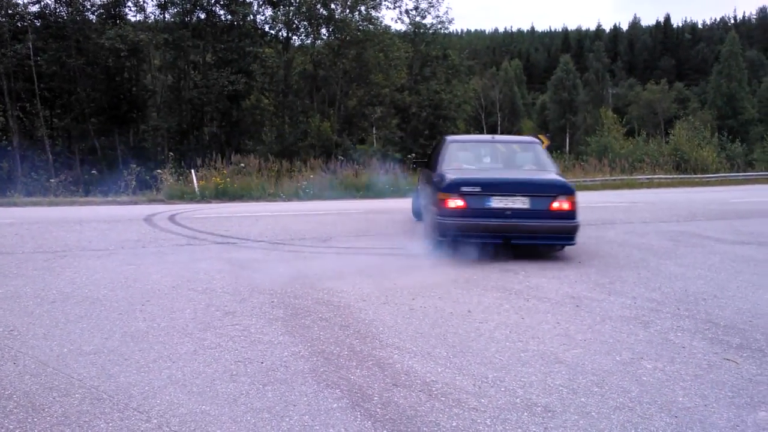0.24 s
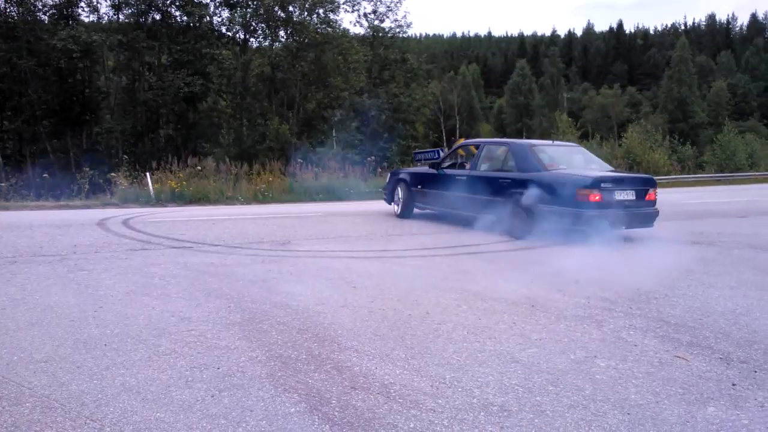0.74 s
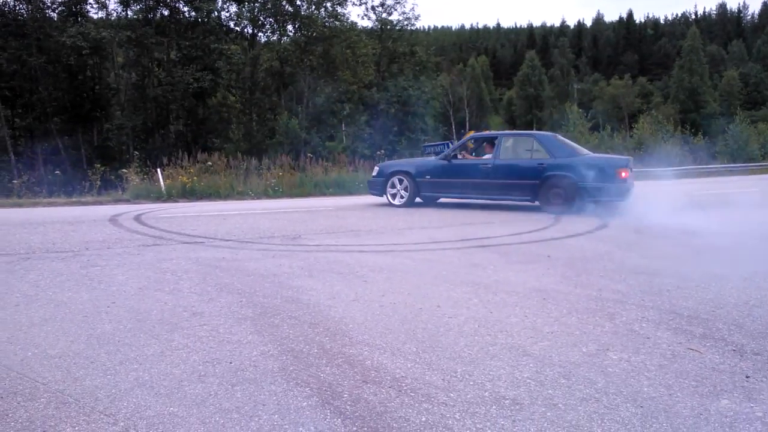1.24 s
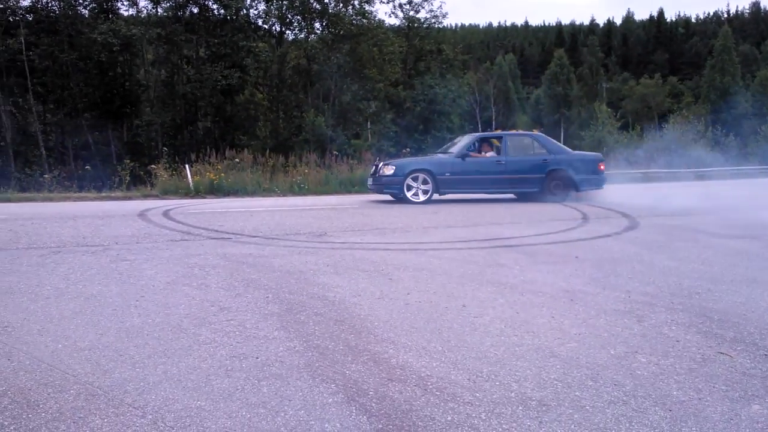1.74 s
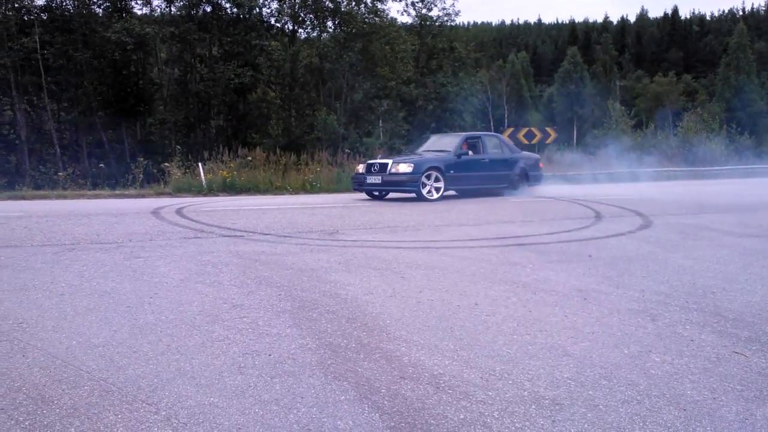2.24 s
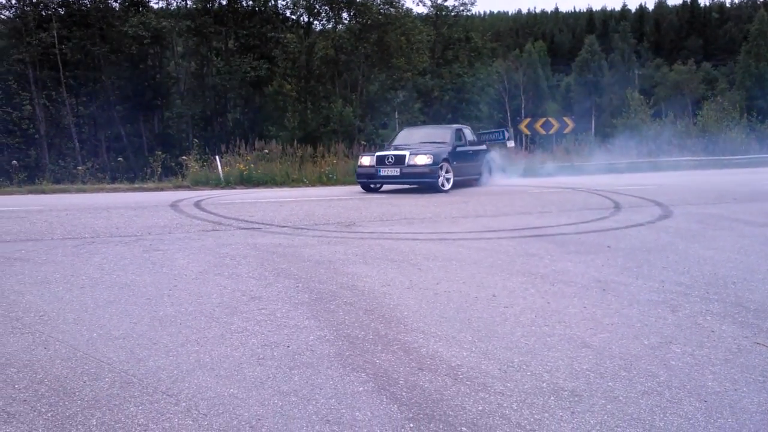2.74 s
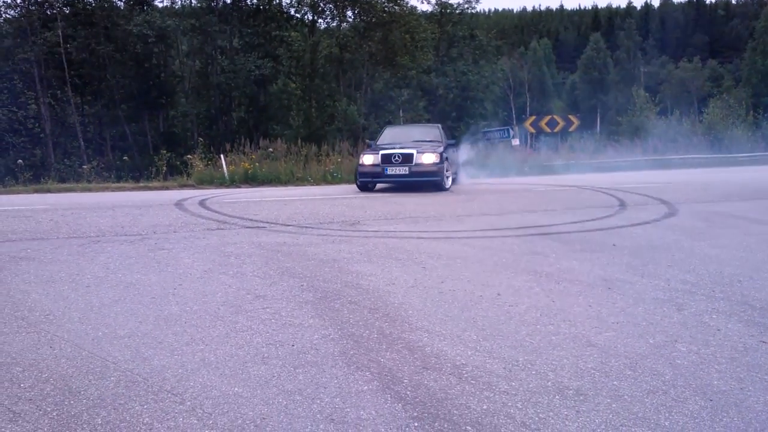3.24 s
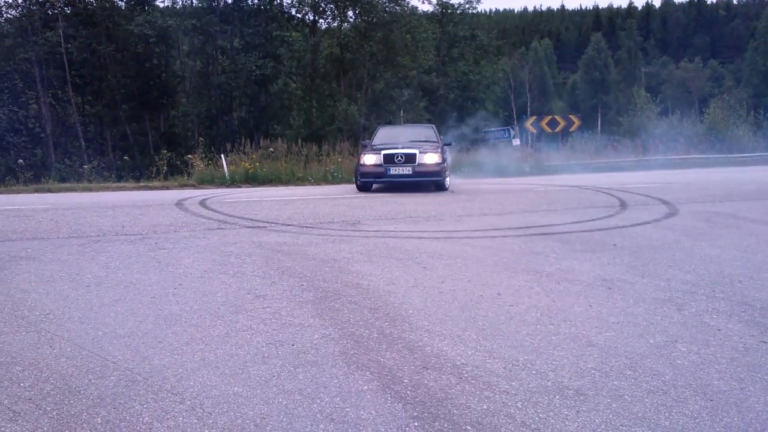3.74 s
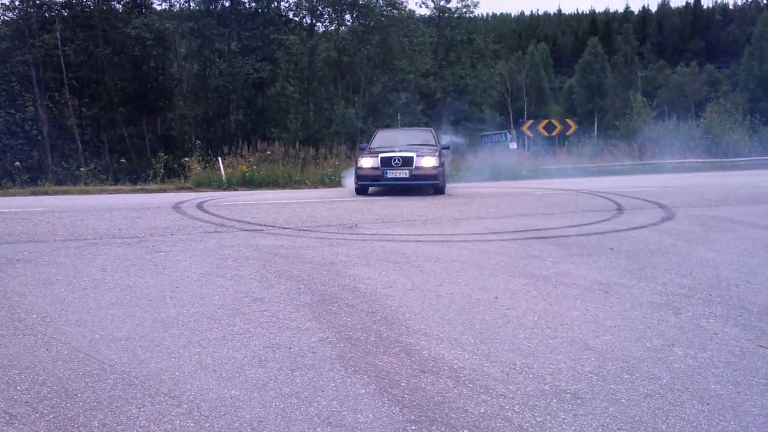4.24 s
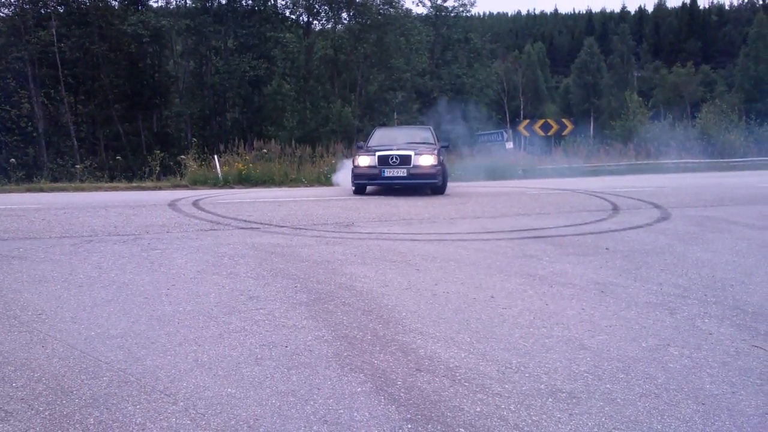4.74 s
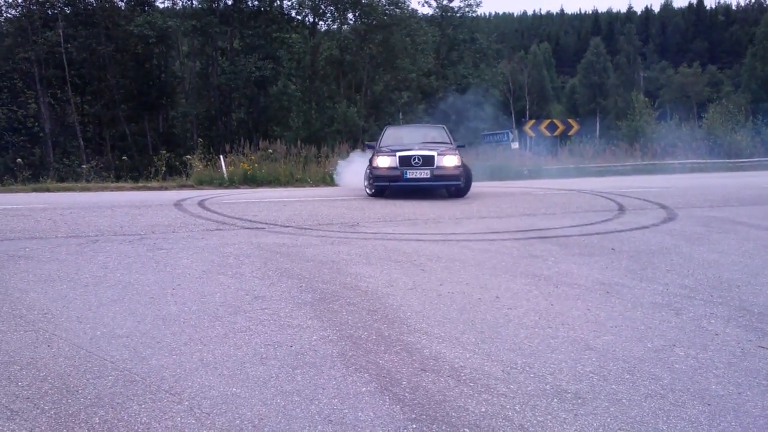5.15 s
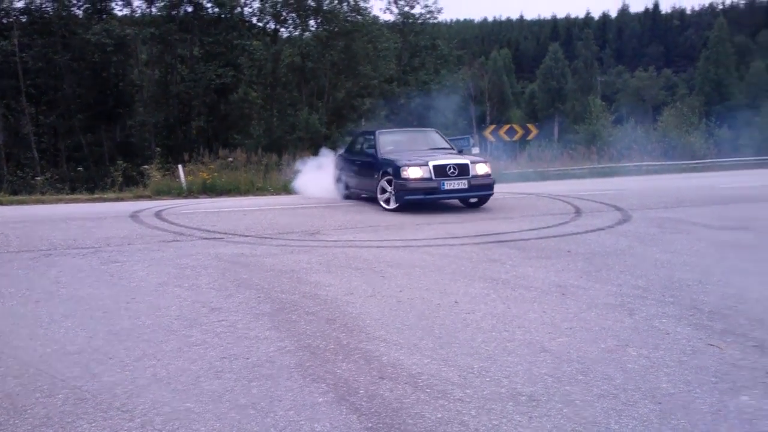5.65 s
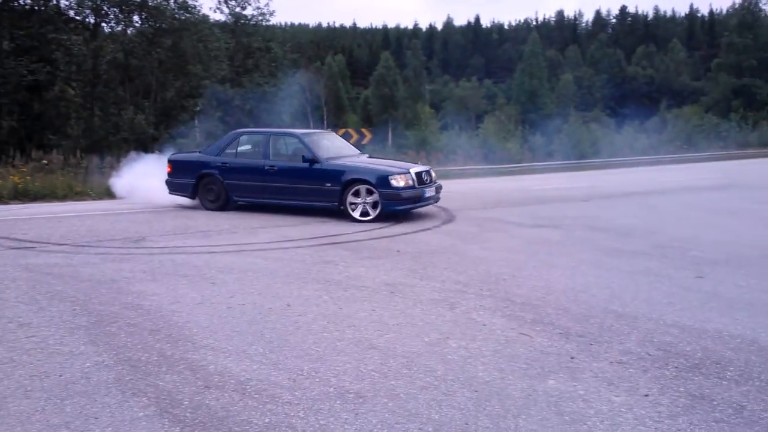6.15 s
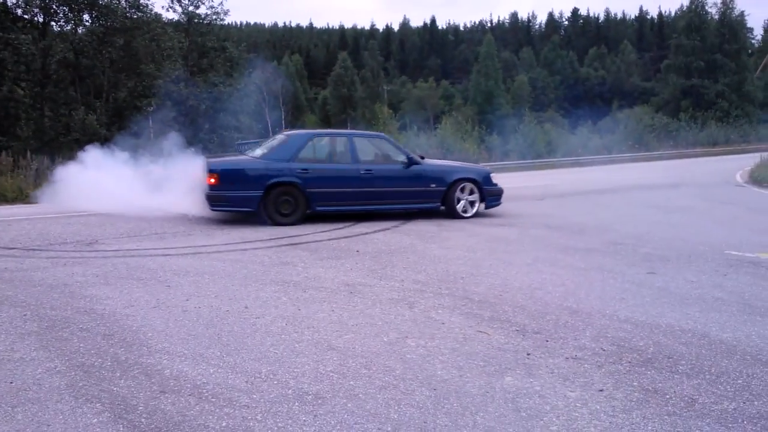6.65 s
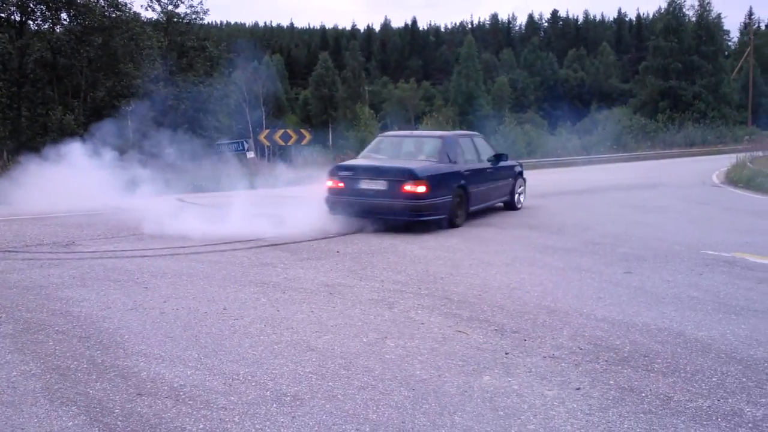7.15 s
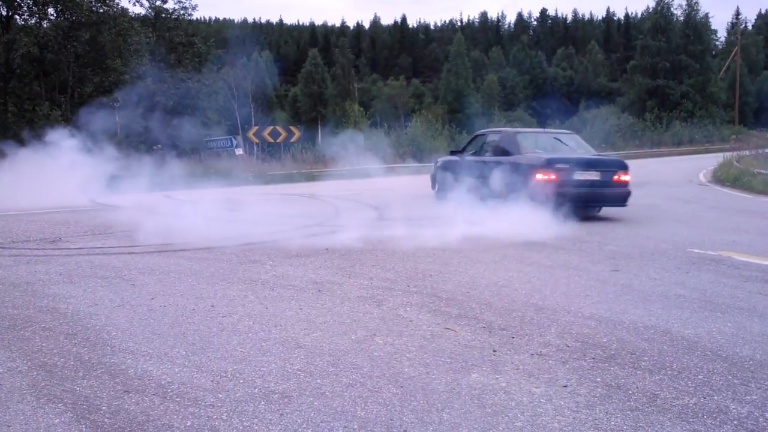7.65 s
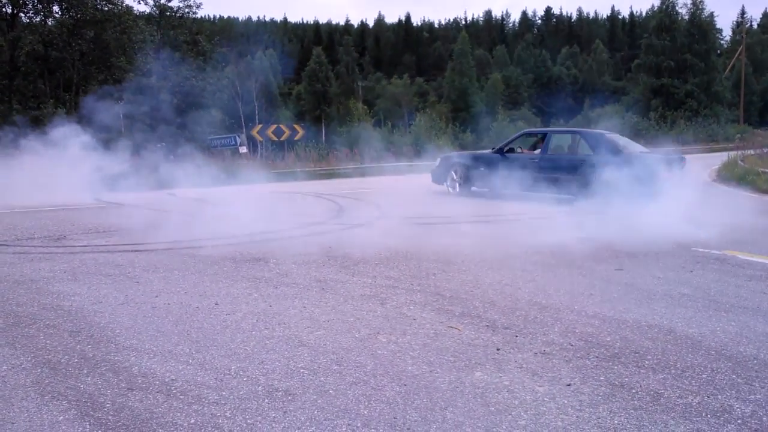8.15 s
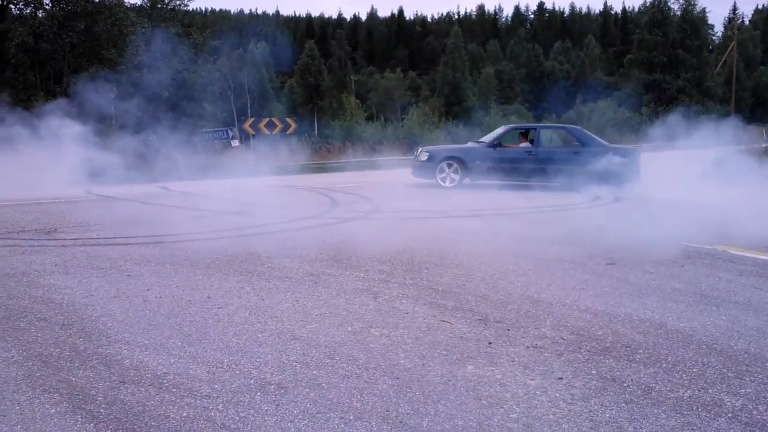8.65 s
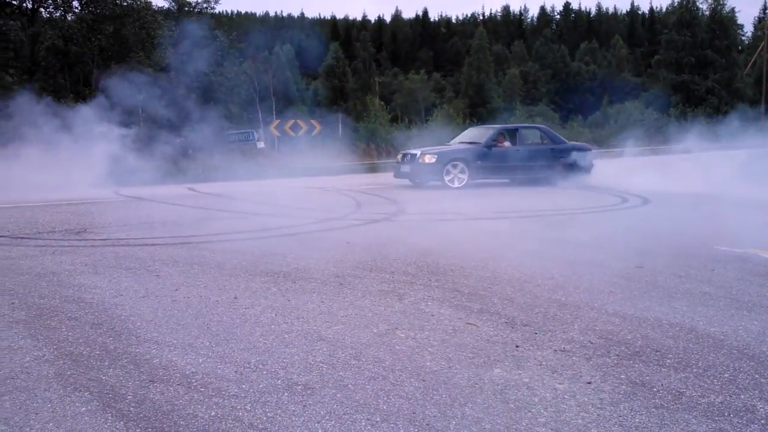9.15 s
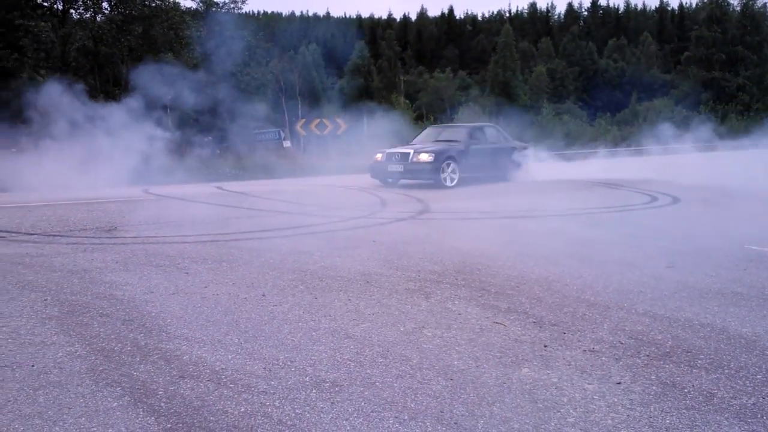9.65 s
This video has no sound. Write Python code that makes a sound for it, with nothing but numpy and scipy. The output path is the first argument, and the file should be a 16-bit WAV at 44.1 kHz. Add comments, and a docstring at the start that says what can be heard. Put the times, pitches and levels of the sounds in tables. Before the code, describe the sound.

A petrol car held at high revs spins its rear tyres on open tarmac, shrieking first and again midway over a rough tread roar.

```python
"""Tyre-spinning car on tarmac

Place: open tarmac, where a four-cylinder petrol car spins its rear tyres in circles.
Sources: the exhaust booms at the firing rate with a thin whine, both as sines; filtered noise makes the tread roar,
and jittery tones make the tyres shriek as the tail swings near. Distance: heard only in level and heading curves.
Microphone: small, overloading on the peaks; the tarmac adds one short, dull echo of the tyres."""
import sys
import numpy as np
from scipy import signal
from scipy.io import wavfile
from scipy.ndimage import uniform_filter1d, minimum_filter1d

SR = 44100
rng = np.random.default_rng(int(sys.argv[2]) if len(sys.argv) > 2 else 0)


def to_wav(sig):
    """Store sig (one row per channel, or 1-D mono) as 16-bit WAV at the path in sys.argv[1].

    Samples outside -1..1 are clipped; the rate is SR.
    """
    pcm = np.clip(np.atleast_2d(sig), -1, 1) * 32767
    pcm = np.round(pcm).astype(np.int16)
    wavfile.write(sys.argv[1], SR, pcm.T)  # frames by channels


N = 436590

# Firing rate of the engine: t/s, f/Hz
FIRING_RATE = [(0, 189.5), (.4, 188), (1.0, 189.8), (2.9, 190), (3.7, 192.3), (4.1, 194), (4.6, 205.6),
               (6.28, 205.6), (6.8, 197.5), (7.1, 178.7), (7.62, 179), (8.77, 189.7), (9.9, 198.3)]
# Way the car points as it turns on the spot; 0 = tail to the microphone, 180 = nose: t/s, heading/degrees
HEADING = [(0, -17), (.5, -7), (1.5, 83), (2.5, 143.5), (3.25, 170.5), (4.5, 188), (5.5, 203), (6.4, 266),
           (7.4, 370.5), (8.3, 449), (9.9, 525)]
# Firing tone, loud while the pipe is seen from the side: t/s, level/dB
BOOM_LEVEL = [(0, -25), (.22, -31), (.6, -21.5), (1.35, -16.5), (1.76, -16.5), (2.5, -21.5), (3.0, -34.5),
              (3.7, -33.5), (4.15, -38), (4.6, -26), (5.6, -24), (6.9, -22.5), (7.06, -30.5), (7.36, -27.5),
              (7.56, -22.5), (8.08, -21), (8.41, -16.5), (8.8, -16.5), (9.9, -22.5)]
# Brief dips of the firing tone as the revs fall: t/s, depth/dB
BOOM_DIPS = [(6.42, 9), (6.69, 4.5), (6.972, 6)]
# Other tones of the engine cycle, each beaming one way:
# multiple of firing rate, level off beam/dB, gain on beam/dB, beam heading/degrees, half-width/degrees
OVERTONES = [(.5, -59.5, 7.5, 270, 68), (.75, -58, 4, 330, 44), (1.25, -45, 5.5, 195, 36),
             (1.5, -45.5, 4.5, 210, 70), (1.75, -60, 5, 300, 60), (2, -45.5, 5, 220, 80),
             (2.25, -51.5, 12, 160, 60), (2.5, -45, 14, 255, 100), (2.75, -47.5, 12, 260, 40),
             (3, -38.5, 4.5, 140, 160), (3.25, -51.5, 7.5, 90, 40), (3.5, -43.5, 10.5, 150, 30),
             (3.75, -48, 12.5, 185, 21), (4, -46, 4, 100, 26), (4.5, -48.5, 15, 244, 51),
             (5, -40, 8, 210, 45)]
# Thin whine geared to the engine: the last four columns of OVERTONES
WHINE_BEAM = (-43, 12, 145, 40)
# Low growl of the tread: t/s, level/dB
GROWL_LEVEL = [(0, -7.5), (.25, -15), (.65, -15.5), (.9, -16.5), (1.08, -11.5), (1.3, -18), (1.6, -17.5),
               (2.8, -20.5), (4.1, -21.5), (4.55, -20), (5.1, -22.5), (5.85, -18), (6.22, -21.5),
               (6.32, -15), (6.7, -19), (6.85, -13), (6.98, -20.5), (7.12, -12.5), (7.8, -16.5),
               (8.36, -16.5), (8.6, -20), (9.13, -20.5), (9.7, -19), (9.9, -24)]
# Roar of the tread, loud while the tail is near: t/s, level/dB
ROAR_LEVEL = [(0, -11), (.25, -15), (.5, -17.5), (1.0, -17.5), (2.2, -18.5), (2.8, -18), (5.1, -19.5),
              (6.3, -18), (6.9, -16), (7.1, -14), (7.3, -15.5), (7.5, -16), (7.65, -19), (8.1, -19.5),
              (8.7, -19.5), (9.5, -18.5), (9.9, -18)]
# Relative noise spectra of the four rubbing ranges, low to high: f/Hz, level/dB per Hz
GROWL_SPECTRUM = [(60, -38.5), (150, -13), (300, -8.5), (500, -8), (800, -0.5), (1100, 2), (1500, 1.5),
                  (2200, -27.5)]
SCRUB_SPECTRUM = [(900, -24.5), (1400, 1.5), (1700, -3.5), (2300, 0), (2900, -8.5), (4000, -16)]
RASP_SPECTRUM = [(2000, -5.5), (2700, -7.5), (3400, -5), (4500, -20)]
HISS_SPECTRUM = [(3000, -10), (3900, -2.5), (4600, -4), (5600, -4)]
# Rasp against scrub: level off beam/dB, gain on beam/dB, beam heading/degrees, half-width/degrees
RASP_BEAM = (-7, 3.5, 169, 81.5)
# Stick-slip shrieks: t of full height/s, f/Hz, level/dB, hold/s
SHRIEKS = [(.025, 1720, -12.5, 0.029), (.09, 1734, -11, 0.073), (0.189, 2295, -14, 0.049),
           (0.279, 2283, -16, 0.088), (0.394, 1733, -20, 0.16), (0.402, 2142, -15.5, 0.1656),
           (0.594, 2280, -12, .05), (0.647, 2250, -9, .025), (0.689, 2190, -17, 0.028),
           (7.164, 1620, -17.5, 0.065), (7.243, 1720, -10.5, .03), (7.241, 2140, -25, .015),
           (7.304, 1750, -16.5, .035), (7.322, 2112, -12.5, .028), (7.34, 1788, -6.5, .05),
           (7.385, 2243, -8.5, 0.017), (7.393, 1577, -11.5, 0.018), (7.438, 2170, -7, .028),
           (7.479, 2230, -9, .02), (7.479, 1707, -14.5, 0.024), (7.501, 2250, -12, 0.03),
           (7.57, 1700, -14, 0.023), (7.68, 1650, -14.5, 0.078), (7.7, 2170, -14.5, 0.035),
           (7.775, 1600, -19, .05), (7.866, 1772, -14.5, 0.044), (7.869, 2100, -15, 0.07),
           (7.948, 2194, -16.5, .08), (7.95, 1706, -19.5, 0.3)]
# Barks, short harsh flashes: mostly a shriek's octave breaking out, a few brief high shrieks of their own: t of
# peak/s, f/Hz, level/dB, length/s
BARKS = [(.2, 4800, -20, .06), (.612, 2900, -15, .03), (.655, 2750, -14, .035), (7.26, 3450, -13, .025),
         (7.352, 3520, -11, .016), (7.374, 3580, -9, .014), (7.395, 4600, -16, .012),
         (7.475, 4400, -17, .015), (7.492, 4050, -16, .015), (7.52, 5100, -19, .012),
         (7.59, 3300, -18, .015), (8.1, 3350, -19, .02)]
# Dips of the microphone housing: f/Hz, width/Hz, depth/0-1
HOUSING_NOTCHES = [(1385, 120, .5), (3750, 150, .45), (5120, 200, .3)]

CRUISE_HZ = 190  # firing rate at which the rev-dependent levels are unchanged
DIP_S = 0.051  # time from the middle of a dip to 1/e of its depth
OVERTONE_DB_PER_HZ = 0.1164  # fuller as the revs rise
WHINE_MULTIPLE = 14.2  # of the firing rate
GROWL_YIELDS_DB = 15  # the growl sinks this many dB times the height of the shriek
HISS_JOINS_DB = 11.5  # rasp and hiss rise this many dB times the height of the shriek
RASP_DB_PER_HZ, HISS_DB_PER_HZ = 0.28, 0.14  # brighter as the wheels spin faster
HISS_DB = -7.5  # against the scrub
SHRIEK_ATTACK_S, SHRIEK_RELEASE_S = .01, .016
SECOND_TYRE_HZ = 1950  # the second tyre sings above this pitch
BARK_FIFTH_DB = -5  # the shriek's next overtone, a fifth above the bark
GROUND_LAG_S, GROUND_DB, GROUND_CUT_HZ = 0.0016856, -8, 1860
LIMIT = .7  # limiter threshold, full scale = 1
CUTOFF_HZ = 5440  # top of the microphone's band


def engine():
    """Exhaust pulses give steady tones locked to the firing rate; also returns the firing phase."""
    (firing_hz,), (boom_db,), (heading,) = in_time(FIRING_RATE), in_time(BOOM_LEVEL), in_time(HEADING)
    t = np.arange(N) / SR
    phase = 2 * np.pi * np.cumsum(firing_hz * (1 + .001 * drift(8))) / SR
    dips_db = sum(depth * np.exp(-((t - s) / DIP_S) ** 2) for s, depth in BOOM_DIPS)
    tones = [(1, boom_db - dips_db)]
    revs_db = OVERTONE_DB_PER_HZ * (firing_hz - CRUISE_HZ)
    for multiple, *beam in OVERTONES:
        tones.append((multiple, beamed(heading, *beam) + revs_db))
    out = whine(phase, heading)
    for multiple, level_db in tones:
        # higher tones waver more in the stirred air
        waver_depth_db = .55 * multiple + 1.0 * (multiple != 1)
        gain = from_db(level_db + waver_depth_db * drift(11.0))
        out = out + gain * np.sin(multiple * phase + rng.uniform(0, 7))
    return np.sqrt(2) * out, phase  # levels become rms levels


def whine(phase, heading):
    """A thin sine geared to the engine, beamed and slowly wavering."""
    level_db = beamed(heading, *WHINE_BEAM) + 1.7 * drift(7.6)
    return from_db(level_db) * np.sin(WHINE_MULTIPLE * phase)


def tread(phase, singing):
    """Four ranges of rubbing noise, pulsed a little by the torque of each firing and each engine cycle."""
    (growl_db,), (roar_db,), (firing_hz,) = in_time(GROWL_LEVEL), in_time(ROAR_LEVEL), in_time(FIRING_RATE)
    (heading,) = in_time(HEADING)
    faster_hz = firing_hz - CRUISE_HZ
    pulse = 1 + .06 * np.cos(phase) + .05 * np.cos(phase / 4)  # four firings to a cycle
    judder = from_db(0.5 * drift(9.8))  # the tyres hop together
    growl = from_db(growl_db - GROWL_YIELDS_DB * singing) * rubbing(GROWL_SPECTRUM, patchy_db=2.5)
    scrub = rubbing(SCRUB_SPECTRUM, patchy_db=0.6)
    rasp_db = beamed(heading, *RASP_BEAM) + RASP_DB_PER_HZ * faster_hz
    rasp = from_db(rasp_db) * rubbing(RASP_SPECTRUM, patchy_db=1.0)
    hiss = from_db(HISS_DB + HISS_DB_PER_HZ * faster_hz) * rubbing(HISS_SPECTRUM, patchy_db=1.4)
    bright = from_db(HISS_JOINS_DB * singing) * (rasp + hiss)
    roar = judder * from_db(roar_db) * (scrub + bright)
    return pulse * (growl + roar)


def rubbing(spectrum, patchy_db):
    """Third-octave bands of noise, each with its own level and flicker; rms 1."""
    hz, level_db = np.transpose(spectrum)
    edges = hz[0] * 2 ** np.arange(0, np.log2(hz[-1] / hz[0]) + .3, 1 / 3)
    white = rng.standard_normal((2, N))  # neighbouring bands take different noise
    out = 0
    for k, (low, high) in enumerate(zip(edges, edges[1:])):
        bandpass = signal.butter(2, [low, high], "band", fs=SR, output="sos")
        band = signal.sosfilt(bandpass, white[k % 2])
        log_centre = np.log(low * high) / 2
        band_db = np.interp(log_centre, np.log(hz), level_db)
        out = out + band * from_db(band_db + patchy_db * drift(7.2))
    return rms_one(out)


def shrieks():
    """Stick-slip makes both tyres sing while the tail swings near; also returns the height of the song."""
    out, singing, t = np.zeros(N), np.zeros(N), np.arange(N) / SR
    for second in (False, True):
        height, pitch_hz = np.zeros(N), np.zeros(N)
        for s, hz, db, hold in SHRIEKS:
            if (hz > SECOND_TYRE_HZ) == second:
                rise = np.clip((t - s) / SHRIEK_ATTACK_S + 1, 0, 1)
                fall = np.exp(-np.maximum(t - s - hold, 0) / SHRIEK_RELEASE_S)
                shape = from_db(db) * rise * fall
                # the stronger shriek sets the pitch
                pitch_hz = np.where(shape > height, hz, pitch_hz)
                height = np.maximum(shape, height)
        glide_hz = uniform_filter1d(pitch_hz, size=600)
        out += height * jittery_tone(glide_hz, wander=.035, jitter=.08, flutter_db=3.5)
        singing = np.maximum(singing, height)
    return out + barks(), singing


def barks():
    """Harsh flashes, mostly a shriek's octave breaking out, some brief high shrieks of their own; each with a
    tone a fifth above."""
    t = np.arange(N) / SR
    s, pitch_hz, level_db, length = np.transpose(BARKS)
    nearest = np.searchsorted((s[1:] + s[:-1]) / 2, t)
    flash = from_db(level_db[nearest]) * np.exp(-(2 * (t - s[nearest]) / length[nearest]) ** 2)
    out = np.zeros(N)
    for ratio, db in ((1, 0), (1.5, BARK_FIFTH_DB)):
        tone = jittery_tone(ratio * pitch_hz[nearest], wander=.012, jitter=.035, flutter_db=1.5)
        out += flash * from_db(db) * tone
    return out


def jittery_tone(pitch_hz, wander, jitter, flutter_db):
    """Rubber grips and lets go unevenly: pitch wanders and jitters, strength flutters; rms 1."""
    uneven_hz = pitch_hz * (1 + wander * drift(30) + jitter * drift(300))
    phase = 2 * np.pi * np.cumsum(uneven_hz) / SR
    return rms_one(np.sin(phase) * from_db(flutter_db * drift(80)))


def ground_echo(tyres):
    """The tarmac returns the tyre noise late, weaker and duller, combing its spectrum."""
    sample = np.arange(N)
    late = np.interp(sample - GROUND_LAG_S * SR, sample, tyres)
    dull = signal.sosfilt(signal.butter(1, GROUND_CUT_HZ, fs=SR, output="sos"), late)
    return from_db(GROUND_DB) * dull


def beamed(heading, db, gain_db, towards, half_width):
    """Level in dB of a sound that is loudest at one heading of the car."""
    off = (heading - towards + 180) % 360 - 180  # shortest way round
    return db + gain_db * np.exp(-(off / half_width) ** 2)


def drift(pole_hz):
    """Slow chance: noise twice through a one-pole low-pass at an eighth of the sample rate; rms 1."""
    r = np.exp(-16 * np.pi * pole_hz / SR)
    noise = rng.standard_normal(N // 8 + 4002)
    slow = signal.lfilter([1], [1, -2 * r, r * r], noise)[4000:]  # skip the filter's start
    return np.interp(np.arange(N) / 8, np.arange(len(slow)), rms_one(slow))


def in_time(rows):
    """Columns of a curve table, one value a sample."""
    s, *columns = np.transpose(rows)
    return [np.interp(np.arange(N) / SR, s, c) for c in columns]


def from_db(db):
    """Decibels to gain."""
    return 10 ** (np.asarray(db) / 20)


def rms_one(x):
    """Scale to rms 1."""
    return x / np.sqrt(np.mean(x ** 2) + 1e-20)


def scene():
    """Exhaust and tyres on the tarmac, with the ground echo of the tyres."""
    exhaust, phase = engine()
    song, singing = shrieks()
    tyres = tread(phase, singing) + song
    return (exhaust + tyres + ground_echo(tyres))[None]


def record(dry):
    """Housing notches, rumble from a lopsided capsule when loud, a fast limiter on the peaks, a cut top."""
    for hz, width, depth in HOUSING_NOTCHES:
        dry = dry - depth * signal.lfilter(*signal.iirpeak(hz, hz / width, fs=SR), dry)
    leak = np.minimum(np.abs(dry), .9) ** 5  # one-sided, steep with level
    rumble = signal.sosfilt(signal.butter(1, [30, 130], "band", fs=SR, output="sos"), leak)
    peak_gain = minimum_filter1d(LIMIT / np.maximum(np.abs(dry), LIMIT), size=21)
    held = dry * uniform_filter1d(peak_gain, size=21) + from_db(-10) * rumble
    return signal.sosfilt(signal.ellip(16, .5, 95, CUTOFF_HZ, fs=SR, output="sos"), held)


dry = scene()
out = record(dry)
to_wav(out)
```